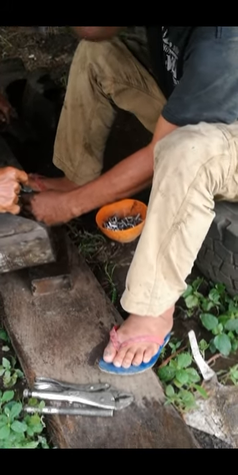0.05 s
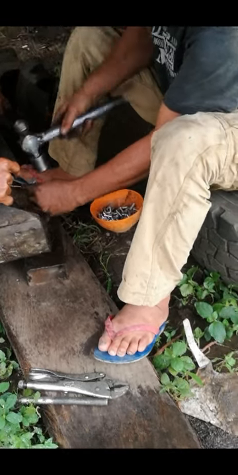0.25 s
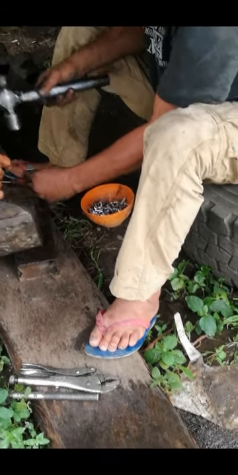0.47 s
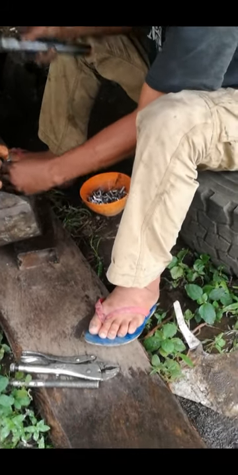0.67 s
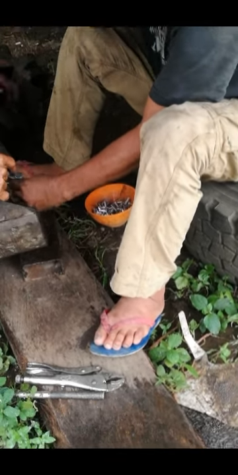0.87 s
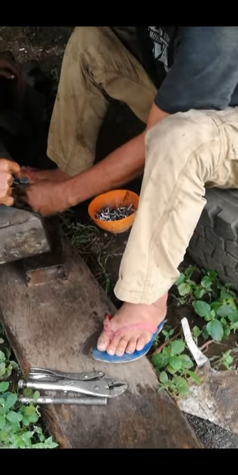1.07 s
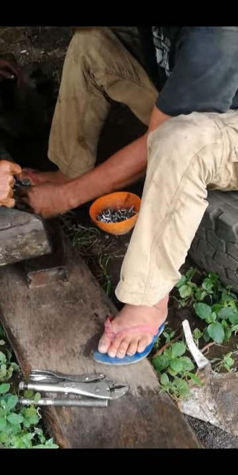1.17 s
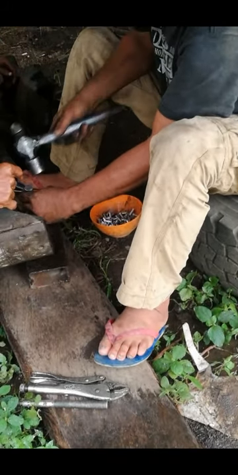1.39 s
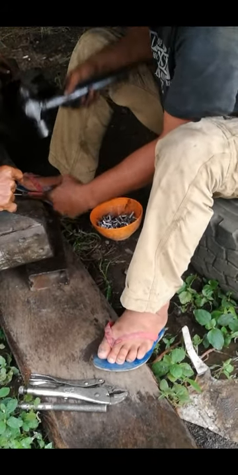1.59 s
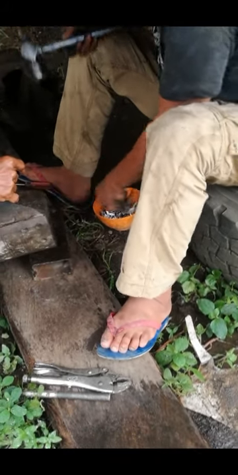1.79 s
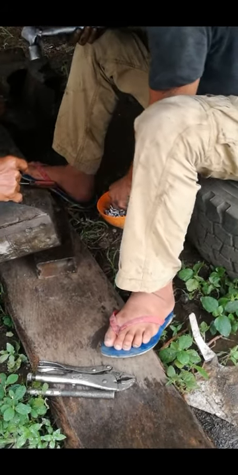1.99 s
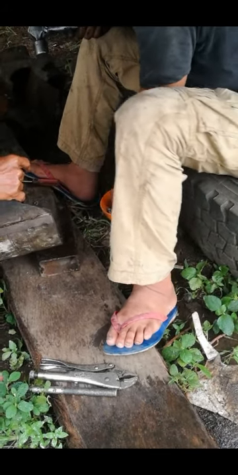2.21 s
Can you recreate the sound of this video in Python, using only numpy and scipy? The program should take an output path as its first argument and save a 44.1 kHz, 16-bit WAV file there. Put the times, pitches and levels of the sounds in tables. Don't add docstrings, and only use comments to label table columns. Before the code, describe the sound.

Hammer blows on a riveted brake shoe over a steel block: one sharp clang, a faint metal tap, then a second clang. Outdoors, close phone microphone overloading slightly, with quiet distant rumble behind.

```python
import sys
import numpy as np
from scipy import signal
from scipy.io import wavfile
from scipy.ndimage import uniform_filter1d

SR = 44100
rng = np.random.default_rng(int(sys.argv[2]) if len(sys.argv) > 2 else 0)


def boost_factor(decibels):
    exponent = np.asarray(decibels, float) / 20
    return 10 ** exponent


def put_to_file(sound):
    columns = np.atleast_2d(sound).T
    safe = np.clip(columns, -1, 1)
    whole_steps = np.round(safe * 32767)
    wavfile.write(sys.argv[1], SR, whole_steps.astype(np.int16))


N = 99225
SPAN = int(.6 * SR)
RATTLE_RAD = 1.2

# [f/Hz, level/dB]
SHADE = [(100, 0), (400, 0), (1000, -2), (2400, -4), (4400, -8), (8000, -12), (15000, -17)]


def read(table, hz):
    table = np.array(table, float)
    return np.interp(np.log(hz), np.log(np.maximum(table[:, 0], 1)), table[:, 1])


def unit(x):
    return x / np.sqrt(np.mean(x ** 2))


def walk(rate_hz):
    k = int(SR / rate_hz)
    held = np.repeat(rng.standard_normal(N + 1)[:N // k + 1], k)
    return 1.5 * uniform_filter1d(uniform_filter1d(held, k), k)[:N]


def band(x, hz, width_hz):
    edges_hz = np.clip([hz - width_hz / 2, hz + width_hz / 2], 5, .48 * SR)
    return signal.sosfilt(signal.butter(2, edges_hz, "band", fs=SR, output="sos"), x)


def add(out, x, at_s):
    i = int(at_s * SR)
    out[:, i:i + x.shape[1]] += x[:, :N - i]


def late_right(x):
    k = int(round(.00059 * SR))
    return np.array([x[0], np.r_[np.zeros(k), x[1, :len(x[1]) - k]]])


def air():
    # [f/Hz, level/dB per Hz]
    spectrum = [(15, -42), (25, -12), (192, -6), (403, -20.5), (448, -26), (1360, -20.5), (1510, -26.5),
                (3730, -30), (14000, -56.5)]
    # [t/s, level/dB]
    hiss = [(0, 0.5), (0.499, 2), (0.798, -1), (1.702, 0.5), (1.9, -2), (2.25, -3)]
    # [t/s, level/dB]
    drone_level = [(0, -83.5), (.6, -86.5), (1.1, -83), (1.6, -85.5), (1.78, -67.5), (1.97, -75.5),
                   (2.25, -81.5)]
    t = np.arange(N) / SR
    hiss_db = np.interp(t, *np.array(hiss).T)
    swell = walk(1.3)
    out = 0
    for hz in 25 * 2 ** np.arange(0, 9.2, .5):
        mid, side = band(rng.standard_normal((2, N)), hz, hz * .4)
        level_db = read(spectrum, hz) + 1.4 * swell + 1.6 * walk(15) + (hz > 1500) * hiss_db
        pair = mid + min(hz / 700, 1.) * side * np.array([[1], [-1]])
        out = out + boost_factor(level_db) * pair * boost_factor(read(SHADE, hz) * np.array([[-.15], [.15]]))
    drone = unit(band(rng.standard_normal(N), 191, 6.7))
    drone = drone * boost_factor(np.interp(t, *np.array(drone_level).T))
    return boost_factor(-71) * out / np.sqrt(np.mean(out.mean(0) ** 2)) + drone


def puff(length_s, db):
    n = int(length_s * SR)
    rumble = band(rng.standard_normal(SPAN), 72, 90)
    return boost_factor(db) * np.hanning(n) * unit(rumble)[-n:] * np.ones((2, 1))


def rustle(length_s, hz, db):
    c = rng.random((SPAN, 2))[:int(length_s * SR)]
    ticks = band((c[:, 0] < .02) * (c[:, 1] - .5), hz, 260)
    return boost_factor(db) * late_right(unit(ticks) * np.hanning(len(c)) ** .5 * boost_factor([[0], [-3]]))


def modes(hz, db, t60_s, rattle_rad=0., spread=1.):
    t = np.arange(SPAN // 2) / SR
    path = spread * rng.standard_normal((len(hz), 3))
    rings = np.exp(np.outer(2j * np.pi * hz - np.log(1000) / np.maximum(t60_s, .01), t))
    if rattle_rad:
        shake = np.array([walk(100)[:SPAN] for _ in hz]).reshape(len(hz), 2, -1)
        depth = rattle_rad * np.outer(np.clip(hz / 4000, .45, 1), np.minimum(t / .02, 1))
        rings = rings * np.exp(depth * (.35 * shake[:, 0] + 1j * shake[:, 1]))
    left = boost_factor(db) * np.sign(path[:, 2])
    path_db = 4 * path[:, 0]
    path_rad = .77 * path[:, 1] * np.minimum(hz / 400, 1)
    right = left * boost_factor(read(SHADE, hz) + path_db) * np.exp(1j * path_rad)
    fade = np.minimum((t[-1] - t) / .05, 1)
    return late_right((np.array([left, right]) @ rings).imag * fade)


def touch(db):
    # [f/Hz, level/dB, t60/s]
    ring = [(538, -4, .14), (1174, 2, .15), (1400, -10, .08), (1933, -11, .1), (2200, -9, .06),
            (2800, -6, .05), (3095, -6, .05), (3900, -15, .04)]
    return boost_factor(db) * modes(*np.array(ring, float).T, .5 * RATTLE_RAD, .2)


def scatter():
    # [f/Hz, level/dB]
    colour = [(200, -22.5), (430, -6), (1000, -6), (1800, -10.5), (3500, -13.5), (6000, -18), (9500, -32),
              (15000, -45)]
    # [f/Hz, t60/s]
    decay = [(200, .16), (500, .32), (1500, 0.39), (3500, .27), (6000, 0.52), (9000, 0.21), (15000, 0.21)]
    rise_s, end_s, shared = .01, .36, .32
    t = np.arange(SPAN) / SR
    out = 0
    for hz in 200 * 2 ** np.arange(0, 6.3, 1 / 3):
        n = rng.standard_normal((3, SPAN))
        share = 1 - (1 - shared) * min(hz / 400, 1)
        pair = band(np.sqrt(share) * n[0] + np.sqrt(1 - share) * n[1:], hz, hz * .26)
        fade_db = -60 * (t - .08) / read(decay, hz)
        end_db = -60 * (t / end_s * (hz / 2000) ** .12) ** 4
        env = (1 - np.exp(-t / rise_s)) * boost_factor(read(colour, hz) + fade_db + end_db)
        out = out + pair * env * boost_factor([[0], [read(SHADE, hz)]])
    return late_right(out / np.abs(out).max())


def thud():
    t = np.arange(SPAN) / SR
    knock = boost_factor(-4 - 60 * t / .027) * np.sin(2 * np.pi * 180 * t)
    return knock - boost_factor(-60 * t / .032) * np.sin(2 * np.pi * 52 * t)


def chatter(length_s):
    n = int(.03 * SR)
    t, c = np.arange(n) / SR, rng.random((n, 2))
    hits = (c[:, 0] < .03) * (c[:, 1] - .3) * np.exp(-t / length_s)
    hits[0] = .9
    return hits / np.sqrt(np.sum(hits ** 2))


def clang(colour):
    # [f/Hz, t60/s]
    decay = [(200, 0.069), (1000, 0.058), (3000, 0.058), (8000, 0.11), (15000, 0.02)]
    c = rng.random((200, 3))
    hz = 150 * 103 ** ((np.arange(len(c)) + c[:, 0]) / len(c))
    t60_s = read(decay, hz) * (.8 + .5 * c[:, 1])
    density_db = 10 * np.log10(hz / 1000 / t60_s * .1)
    x = modes(hz, read(colour, hz) + density_db + 3 * c[:, 2], t60_s)
    return x / np.sqrt(np.mean(x[:, :900] ** 2))


def blow(row, ring, colour):
    _, clang_db, ring_db, thud_db, scatter_db, chatter_s = row
    half = SPAN // 2
    metal = boost_factor(clang_db) * clang(colour)
    out = boost_factor(scatter_db) * scatter()
    out[:, :half] += signal.fftconvolve(metal, chatter(chatter_s)[None], axes=1)[:, :half]
    out[:, :half] += boost_factor(ring_db) * modes(*np.array(ring, float).T, RATTLE_RAD)
    return out + boost_factor(thud_db) * thud()


def scene():
    # [t/s, length/s, level/dB]
    puffs = [
        (0, .09, -64),
        (1.03, .1, -72),
    ]
    # [t/s, length/s, f/Hz, level/dB]
    rustles = [(.04, .07, 1950, -76), (.14, .06, 2180, -75), (.72, .06, 3800, -81), (.05, .04, 1300, -78),
               (.02, .16, 3000, -80), (.41, .1, 440, -73), (1.615, .08, 2170, -73), (1.63, .18, 3100, -80),
               (1.62, .11, 1850, -79), (1.62, .18, 4200, -81)]
    # [t/s, level/dB]
    touches = [
        (.887, -67),
        (.895, -66),
        (.9015, -56),
    ]
    # [t/s, clang/dB, ring/dB, thud/dB, scatter/dB, chatter/s]
    blows = [
        (0.2043, -10.5, -17, -8, -17, 0.0033),
        (1.3856, -9.5, -18.5, -11.5, -17, 0.0032),
    ]
    # [f/Hz, level/dB, t60/s]
    ring_1 = [(430, -2, .19), (640, -4, .12), (800, 2, .12), (942, -4, .22), (1163, -7, .18),
              (1370, -5, .22), (2800, 2, .05), (3262, -1, .07), (1950, -3, .14), (5163, -4, .09),
              (6191, -7, .11), (6767, -8, .1), (7590, -3, .14), (8430, -18, .23)]
    ring_2 = [(390, -5, .19), (642, -4, .17), (932, -2, .15), (1172, 0, .27), (1320, -2, .13),
              (1453, -8, .13), (3250, -6, .14), (3946, -5, .11), (4231, -9, .13), (5160, -5, .09),
              (6019, -9, .12), (6192, -6, .11), (6771, -10, .12), (8452, -12, .18)]
    # [f/Hz, level/dB]
    colour_1 = [(150, -9), (450, -2.5), (800, 6.5), (1500, -2.5), (3000, 2), (5500, -2), (8500, -7),
                (15500, -27.5)]
    colour_2 = [(88, -43), (150, -11), (1090, 4), (1220, 7.5), (1570, -13.5), (1910, -3), (3550, -7.5),
                (6110, -2), (15500, -42.5)]
    out = air()
    for row, ring, colour in zip(blows, (ring_1, ring_2), (colour_1, colour_2)):
        add(out, blow(row, ring, colour), row[0])
    for at_s, db in touches:
        add(out, touch(db), at_s)
    for at_s, length_s, hz, db in rustles:
        add(out, rustle(length_s, hz, db), at_s)
    for at_s, length_s, db in puffs:
        add(out, puff(length_s, db), at_s)
    return out


def band_limit(x):
    return signal.sosfilt(signal.butter(12, 15980, fs=SR, output="sos"), x)


def record(dry):
    drive, top_hz, settle_hz = 1.1, 15200, 3.5
    x = np.tanh(drive * dry) / np.tanh(drive)
    x = signal.sosfilt(signal.ellip(8, .2, 60, top_hz, fs=SR, output="sos"), x)
    x = signal.sosfilt(signal.butter(1, settle_hz, "high", fs=SR, output="sos"), x)
    return band_limit(np.clip(x, -1, 1))


dry = scene()
out = record(dry)
put_to_file(out)
```